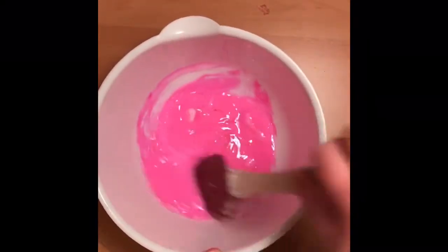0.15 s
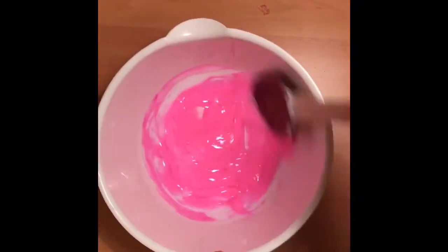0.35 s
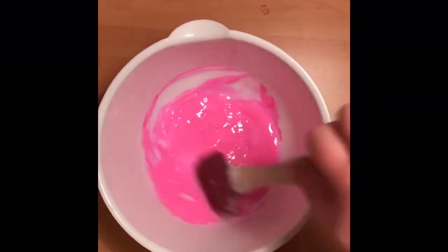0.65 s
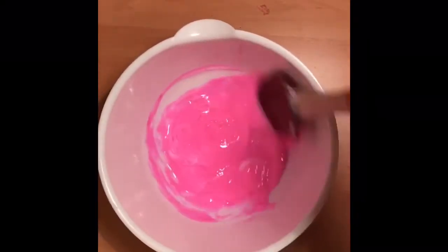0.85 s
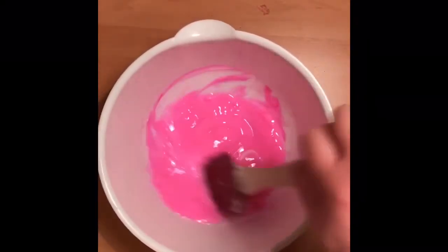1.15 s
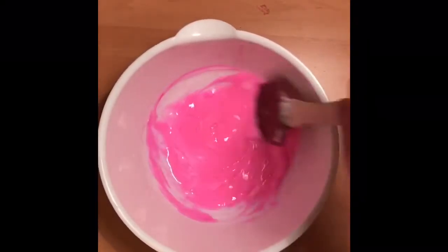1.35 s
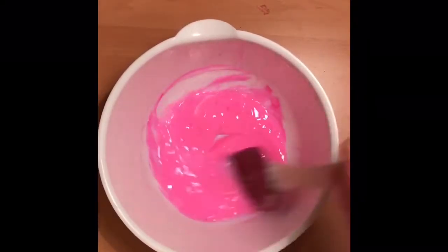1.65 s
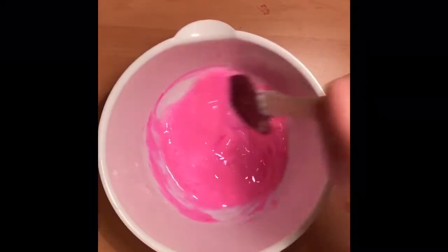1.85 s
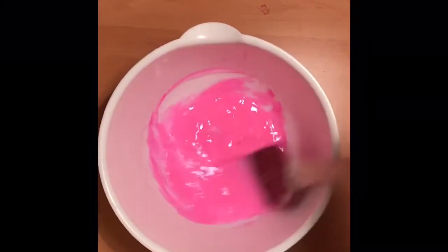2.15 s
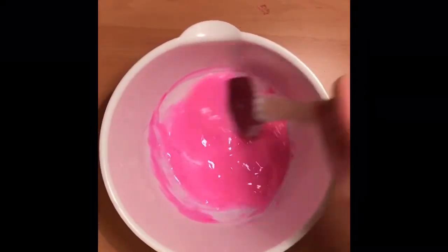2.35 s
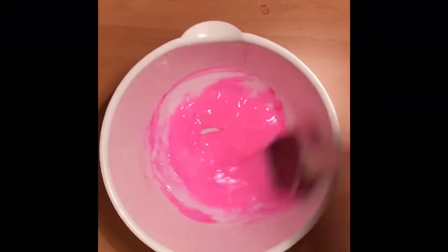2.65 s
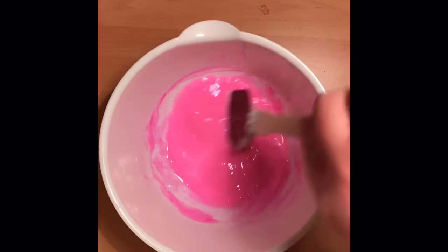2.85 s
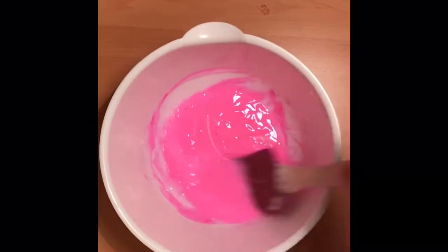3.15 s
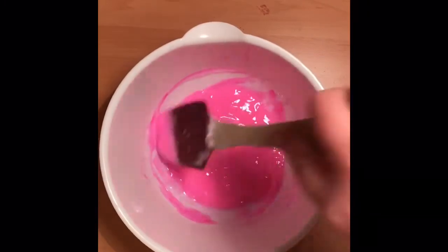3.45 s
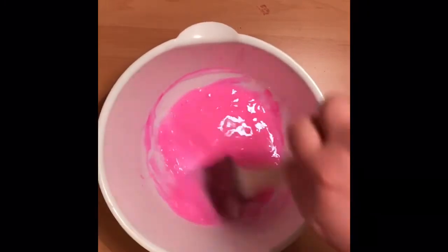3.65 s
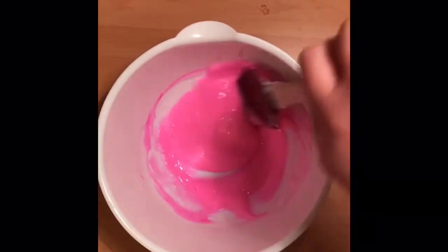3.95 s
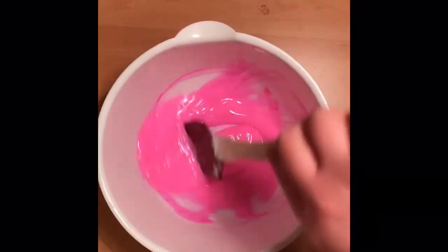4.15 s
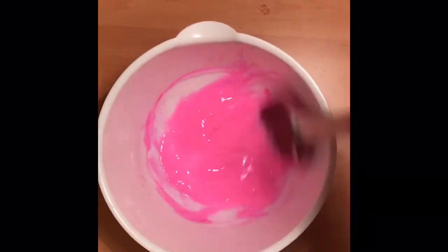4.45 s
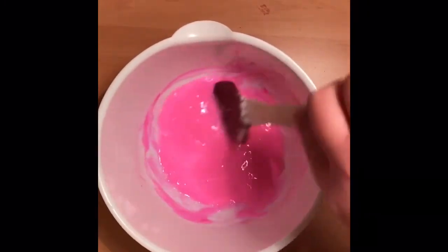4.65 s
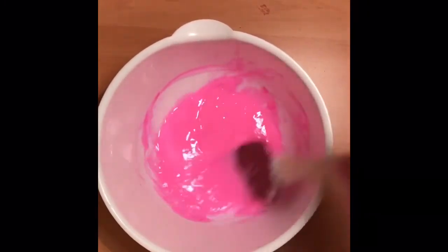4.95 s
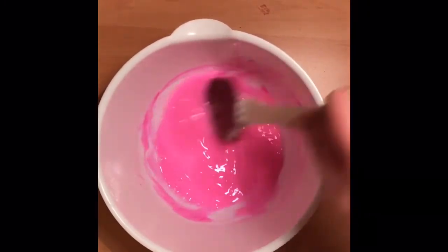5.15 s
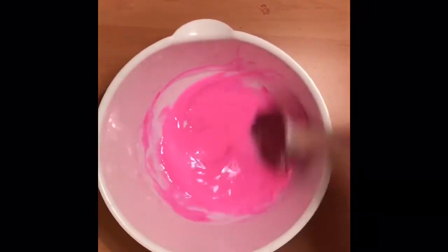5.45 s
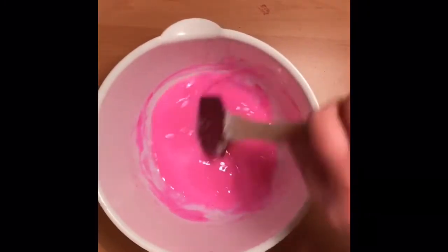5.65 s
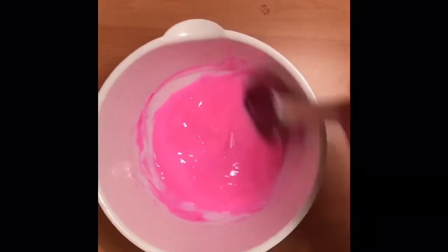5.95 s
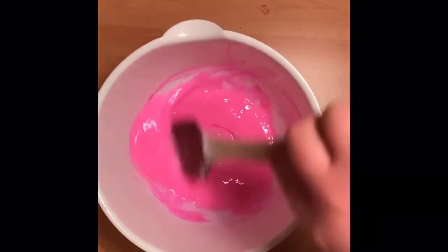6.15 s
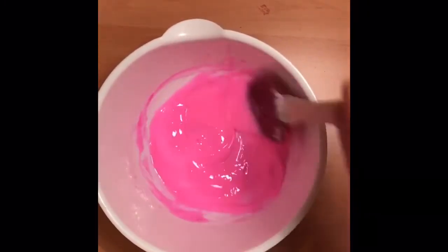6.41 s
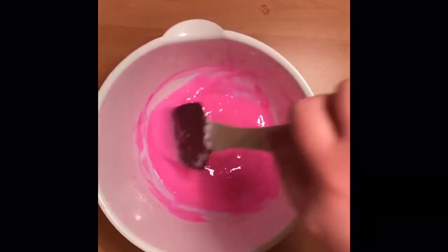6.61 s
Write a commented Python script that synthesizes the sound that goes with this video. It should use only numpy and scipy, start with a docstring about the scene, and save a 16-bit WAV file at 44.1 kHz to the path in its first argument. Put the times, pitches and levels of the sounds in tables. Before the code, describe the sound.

Close up in a small room, a spatula knocks against a plastic bowl in a loose, repeating rhythm as it stirs a thick, sticky mixture. The hollow knocks are strongest at first, give way to a few low thuds midway, then return. Between them the rubber blade rubs along the wall, the slime squelches softly and small bubbles pop over a low rumble and faint hiss.

```python
"""A small room with a wooden table, where a rubber spatula stirs thick slime in a plastic bowl.
Over a faint hiss, each turn lays down a bed of low rumble, drag and wet crackle. Trapped air
bubbles snap, the rubber sticks and slips along the wall, and the bowl gives a few low thuds.
Up front, about twice a second, the blade knocks the wall: a clack, a hollow ring, a table thump."""
import sys
import numpy as np
from scipy import signal
from scipy.fft import rfft, irfft, next_fast_len
from scipy.io import wavfile
from scipy.ndimage import uniform_filter1d, map_coordinates

SR = 44100
rng = np.random.default_rng(int(sys.argv[2]) if len(sys.argv) > 2 else 0)


def waveform_to_disk(signal):
    """Save audio, clipped to [-1, 1], as 16-bit WAV at the path in sys.argv[1]."""
    frames = np.transpose(np.atleast_2d(signal))
    scaled = np.clip(frames, -1, 1) * 32767
    samples = np.round(scaled).astype(np.int16)
    wavfile.write(sys.argv[1], SR, samples)


N = 298998

# tone of the noise floor: f/Hz, level/dB
HISS_EQ = [(25, -5), (60, -0.5), (300, 8.5), (1000, 7), (2500, 3.5), (5000, 1.5), (8500, 0), (10500, -3),
           (12500, -1.5), (15500, -5)]
# decay of the room: f/Hz, t60/s
ROOM_DECAY = [(100, 0.31), (500, 0.261), (2000, 0.213), (6000, 0.12), (14000, 0.054)]
# turns of the spatula round the bowl: start/s, effort/dB, wetness/dB
TURNS = [(-0.19, 4.5, -3), (0.31, 0.5, 1), (0.82, 2, 0), (1.33, -1.5, 1), (1.8, 0.5, -0.5), (2.22, 3, -0.5),
         (2.72, 0, -1), (3.12, -3.5, -3), (3.52, 0, 5), (3.9, 1.5, 1), (4.46, 0.5, -3), (4.93, -1, -4),
         (5.46, -0.5, -2), (5.92, 0, -0.5), (6.4, -2, -6.5)]
# the push builds, peaks and slackens within a turn: position/turns, level/dB
PUSH_ENVELOPE = [(0, -1.5), (0.3, 0.5), (0.65, 0), (0.88, -5), (1, -1.5)]
# low rumble of the table: f/Hz, level/dB
RUMBLE_EQ = [(22, -43.5), (33, -24), (45, 2), (70, -4), (87, 6.5), (125, 2), (170, 2), (210, -12.5),
             (300, -28.5), (600, -73)]
# dull drag on the wall: f/Hz, level/dB
DRAG_EQ = [(30, -59), (100, -20.5), (200, -3), (280, 4.5), (340, -7.5), (440, -15), (540, -3.5), (630, -10),
           (760, -25.5), (1100, -33.5), (3000, -59)]
# wet crackle of stirred slime: f/Hz, level/dB
SQUELCH_EQ = [(400, 3), (900, 2.5), (1700, 3.5), (2600, -3), (4000, -5.5), (8000, -19.5), (15000, -14)]
# bubble snaps: t/s, level/dB, f/Hz, width/octaves, upper resonance/dB, tick/dB
POPS = [(.411, -53.5, 2480, .4, -21.5, -16), (.521, -55, 2800, 0.45, -11, -14.5),
        (.886, -52.5, 2610, 0.41, -25, -18), (1.123, -57.5, 2227, 0.49, -26.5, -23),
        (1.203, -54.5, 8200, 0.15, -30, -1.5), (1.520, -49.5, 7780, 0.52, -21, -2.5),
        (1.5677, -55, 3180, .25, -2.5, -9.5), (1.5951, -47.5, 2760, 0.33, -1.5, 0.5),
        (1.999, -61, 2550, 0.42, -25, -21), (2.428, -55.5, 2490, 0.67, 0.5, -5),
        (2.9356, -57, 4870, 1, -2.5, -6), (4.102, -47.5, 4190, 0.77, -32.5, -12),
        (5.177, -61, 2396, 0.47, -22.5, -17), (5.2363, -45, 2730, 0.22, -17, -15.5),
        (5.327, -56, 3950, 0.66, -18.5, -11)]
# bright tick of a bursting film: f/Hz, level/dB
TICK_EQ = [(500, -9), (1100, -3.5), (2400, 4), (6000, -1.5), (9000, -1.5), (15000, -6.5)]
# early reflections off nearby surfaces: delay/s, level/dB
ECHOES = [(.0053, -10), (.0102, -12)]
# rubs along the wall: centre/s, length at half height/s, judder/dB, squish/dB
RUBS = [(0.188, 0.0543, -56, -75), (0.387, 0.043, -48.5, -63.5), (0.42, 0.027, -46.5, -64),
        (0.892, 0.0392, -44.5, -64.5), (1.322, 0.0346, -65.5, -60), (2.174, 0.055, -56, -78.5),
        (2.296, 0.04, -51.5, -68), (2.491, 0.0316, -56, -69.5), (2.568, 0.017, -65.5, -73),
        (3.177, 0.0524, -57.5, -89.5), (3.57, 0.052, -48.5, -63.5), (3.618, 0.0313, -47.5, -70),
        (4.224, .026, -47.5, -77), (4.71, 0.042, -50.5, -78), (5.247, 0.0676, -54.5, -81.5),
        (5.433, 0.046, -61.5, -69.5), (5.67, 0.062, -44.5, -70.5), (6.29, 0.037, -58.5, -88),
        (6.531, 0.0514, -60, -82.5), (6.752, 0.0262, -46.5, -74.5)]
# the wall under the slipping blade: f/Hz, level/dB
JUDDER_EQ = [(25, -59), (70, -9), (150, 0), (280, 6), (400, -4.5), (545, 0.5), (660, -9), (850, -22),
             (1500, -39.5), (4000, -52.5)]
# slime pressed out under the blade: f/Hz, level/dB
SQUISH_EQ = [(400, -27), (1000, 5), (1600, 9), (2700, 1), (3600, -2), (5000, -11), (9000, -17),
             (15000, -38)]
# low thuds of the bowl, from soft shoves near 100 Hz and the dull body of two wall knocks
# near 200 Hz: centre/s, level/dB, f/Hz
THUDS = [(3.558, -29, 106.8), (3.92, -35.5, 102.8), (4.204, -37.5, 192), (6.267, -41.5, 201),
         (6.744, -30, 102.6)]
# modes of table and bowl: f/Hz, level/dB, t60/s
BOWL_MODES = [(54.67, 6.5, 0.16), (87.14, 14, 0.212), (97.59, 11.5, 0.1565), (134.7, 13, 0.052),
              (155.16, 8, 0.13), (265.86, 2, 0.085), (281.3, 0.5, 0.142), (311.1, 17, 0.0239),
              (443.6, 9.5, 0.02115), (529.24, 9.5, 0.0587), (564.8, 8.5, 0.0393), (672.7, 0.5, 0.0307),
              (781, -39.5, 0.067), (1051.8, -10.5, 0.116), (1128.7, -16, 0.123), (1284.8, -11, 0.09),
              (1352.8, -10.5, 0.107), (1468, -16, 0.0836), (1597, -17, 0.0885), (1882, -20, 0.061),
              (2005.7, -12, 0.0752), (2073, -11, 0.0735), (2232.5, -13, 0.0536), (2447, -11.5, 0.0424),
              (2750, -16.5, 0.024), (3247, -16, 0.017), (3588, -18, 0.0184)]
# crowded upper modes of the wall: f/Hz, level/dB
CLACK_EQ = [(200, -10.5), (600, 16.5), (1300, 5), (2600, 3), (3500, -7.5), (4300, -16.5), (5500, -20),
            (8000, -33), (15000, -52)]
# hits on the wall: t/s, click/dB, ring/dB, thump/dB, hardness/(dB per octave), wall detune/semitones
KNOCKS = [(0.3201, -36.5, -35.5, -40, 1, 0), (0.835, -35.5, -38.5, -38.5, 4.5, 1),
          (1.3427, -39, -41.5, -37.5, 5, 2.5), (2.094, -67, -52, -59.5, 1, 0.5),
          (2.22, -33, -34, -39, 3, 0.5), (2.5402, -74.5, -42.5, -55.5, -5.5, 0.04),
          (2.553, -45, -43, -67, -9.5, 1.29), (2.7253, -57.5, -51, -40, 7.5, 3.5),
          (2.7338, -49.5, -44, -40, 7, 2), (3.571, -80, -48, -41, 4.5, -2),
          (4.1941, -56.5, -44.5, -44.5, -3.5, 4), (4.2195, -72, -45.5, -52.5, 2, 0),
          (4.4769, -43, -45, -44, 3, 1), (4.8989, -53.5, -44, -54, 9.5, 2),
          (5.3152, -49.5, -42.5, -59, 7, 1.5), (5.4675, -37.5, -37, -42, 0.5, 0),
          (5.939, -40, -39.5, -39, 1.5, 0.5), (6.252, -53.5, -51, -59.5, 1, 2),
          (6.263, -58.5, -53, -55.5, 5, 0), (6.413, -44, -48.5, -44, 2.5, 2),
          (6.731, -74.5, -54.5, -46, -11, 1)]


def amp(db):
    """Decibels to gain."""
    return 10 ** (np.asarray(db) / 20)


def unit(x):
    """Scale to rms 1."""
    return x / np.sqrt(np.mean(x ** 2) + 1e-20)


def along(points, hz):
    """Read a curve of (f/Hz, value) points on a log frequency axis."""
    f, v = np.transpose(points)
    return np.interp(np.log(hz + 1), np.log(f + 1), v)


def wobble(rate):
    """Smooth random modulation, rate knots a second."""
    return map_coordinates(rng.standard_normal(int(N * rate / SR) + 4), [np.arange(N) * rate / SR])


def coloured(x, eq):
    """x through an EQ curve, at rms 1."""
    m = next_fast_len(len(x) + 8192)
    gain = amp(along(eq, np.fft.rfftfreq(m, 1 / SR)))
    return unit(irfft(rfft(x, m) * gain, m)[:len(x)])


def noise(size, eq):
    """White noise through an EQ curve, at rms 1."""
    return coloured(rng.standard_normal(size), eq)


def add(track, s, sound):
    """Mix a sound into the track at time s."""
    start = max(round(s * SR), 0)
    part = track[start:start + len(sound)]
    part += sound[:len(part)]


def grains(size, per_s, spread_db):
    """Tiny sticky releases at random moments, a few much louder than the rest."""
    sizes = amp(spread_db * np.minimum(rng.exponential(size=size), 4))
    return (rng.random(size) < per_s / SR) * sizes * rng.standard_normal(size)


def hiss(level_db=-77):
    """A faint, steady noise floor."""
    return amp(level_db) * noise(N, HISS_EQ)


def room(x):
    """The short reverb of a small room, whose treble dies first."""
    hz, t, spectrum = signal.stft(rng.standard_normal(SR // 2), SR, nperseg=256)
    decay = amp(-60 * t / along(ROOM_DECAY, hz)[:, None])
    tail = signal.istft(spectrum * decay, SR, nperseg=256)[1]
    predelayed = np.pad(x, (300, 0))
    return signal.fftconvolve(predelayed, tail / np.linalg.norm(tail))[:N]


def stirring(rumble_db=-59, drag_db=-65, squelch_db=-80.5, lurch_db=3.5, last_turn_s=0.302):
    """The blade ploughs the slime in lurches: its push drives table rumble, wall drag and wet crackle."""
    starts, effort_db, wetness_db = np.transpose(TURNS)
    edges = np.append(starts, starts[-1] + last_turn_s)
    turns_done = np.interp(np.arange(N) / SR, edges, np.arange(len(edges)))
    turn = np.minimum(turns_done.astype(int), len(TURNS) - 1)
    per_turn = lambda values: uniform_filter1d(values[turn], size=SR // 20)  # 50 ms crossfades
    push = per_turn(effort_db) + np.interp(turns_done % 1, *np.transpose(PUSH_ENVELOPE))
    lurch = lurch_db * wobble(18)
    releases = grains(N, per_s=4000, spread_db=1.5)
    rumble = amp(rumble_db + 0.45 * push + 0.5 * lurch) * noise(N, RUMBLE_EQ)
    drag = amp(drag_db + push + lurch) * coloured(releases, DRAG_EQ)
    wet_gain = amp(squelch_db + per_turn(wetness_db) + 0.393 * push + lurch)
    return rumble + drag + wet_gain * coloured(releases, SQUELCH_EQ)


def cavity(size, hz, octaves):
    """An air pocket resonates: a band of noise, 16 dB down at the given width either side of hz."""
    width = 2 ** np.clip(octaves, 0.05, 0.9)
    band = [(hz / 3, -40), (hz / width, -16), (hz, 0), (hz * width, -16), (hz * 2, -30), (hz * 4, -50)]
    return noise(size, band)


def bubble_pops(upper_ratio=2.013, burst_t60=0.007, spray_db=-13, spray_t60=0.0638):
    """A film bursts with a tick and two cavity resonances; the snap bounces around the bowl."""
    out, t = np.zeros(N), np.arange(SR // 10) / SR
    envelope = amp(-60 * t / burst_t60) + amp(spray_db - 60 * t / spray_t60)
    for s, db, hz, octaves, upper_db, tick_db in POPS:
        lower = cavity(len(t), hz, octaves)
        upper = amp(upper_db) * cavity(len(t), hz * upper_ratio, octaves)
        tick = amp(tick_db) * noise(len(t), TICK_EQ)
        snap = amp(db) * envelope * (lower + upper + tick)
        add(out, s, snap)
        for delay, echo_db in ECHOES:
            add(out, s + delay, amp(echo_db) * snap)
    return out


def blade_rubs(slips_per_s=283, jitter=0.1398, grit=0.58):
    """The rubber sticks and slips at an uneven rate, shaking the wall and squeezing the slime."""
    out = np.zeros(N)
    for s, length, judder_db, squish_db in RUBS:
        size = int(2 * length * SR)
        slip_rate = slips_per_s * np.exp(jitter * wobble(120)[:size])
        slips = np.diff(np.floor(np.cumsum(slip_rate) / SR), prepend=0)  # one impulse a slip
        judder = amp(judder_db) * coloured(unit(slips) + grit * rng.standard_normal(size), JUDDER_EQ)
        squish = amp(squish_db) * coloured(grains(size, per_s=6000, spread_db=1.8), SQUISH_EQ)
        add(out, s - size / SR / 2, np.hanning(size) * (judder + squish))
    return out


def bowl_thuds(width_cycles=0.657, rebound_s=0.02763, rebound_db=-5.5, rebound_pitch=0.776):
    """The bowl thuds under a soft shove or a wall knock: three swings, each quieter and deeper."""
    out, t = np.zeros(N), np.arange(-SR // 20, SR // 20) / SR
    for s, db, hz in THUDS:
        for k in range(3):
            cycles = hz * rebound_pitch ** k * t
            swing = -np.sin(2 * np.pi * cycles) * np.exp(-(cycles / width_cycles) ** 2)
            add(out, s + k * rebound_s + t[0], amp(db + k * rebound_db) * swing)
    return out


def wall_clack(t, hardness, attack_s=0.000904, clack_t60=0.0214, clatter_t60=0.1618):
    """The wall's upper modes clack, then clatter; a bare edge is brighter than one padded with slime."""
    decay = amp(-2 - 60 * t / clack_t60) + amp(-14 - 60 * t / clatter_t60)
    attack = 1 - np.exp(-t / attack_s)
    tilted_eq = [(hz, db + hardness * np.log2(hz / 1000)) for hz, db in CLACK_EQ]
    return attack * decay * noise(len(t), tilted_eq)


def wall_knocks(lag_s=0.00874, lag_at_hz=87.14, lag_power=1.226, attack_cycles=3, vary_db=2.5):
    """Each hit rings bowl and table; bending waves carry the treble out first and the thump last."""
    out, t = np.zeros(N), np.arange(SR // 2) / SR
    rest_hz, mode_db, t60 = np.transpose(BOWL_MODES)[:, :, None]
    is_wall = (rest_hz > 400) & (rest_hz < 900)
    age = np.maximum(t - lag_s * (lag_at_hz / rest_hz) ** lag_power, 0)
    for s, click_db, ring_db, thump_db, hardness, semitones in KNOCKS:
        # the spot that is hit and the shifting load of slime detune the wall
        hz = rest_hz * 2 ** (is_wall * semitones / 12)
        # slime sliding on the wall smears the ring
        drift = signal.resample(rng.standard_normal((len(BOWL_MODES), 48)), len(t), axis=1)
        smear = 0.9 * drift * np.minimum(age * hz / 25, 1)
        attack = 1 - np.exp(-age * hz / attack_cycles)
        modes = np.sin(2 * np.pi * hz * age + smear) * attack * amp(mode_db - 60 * age / t60)
        hit_eq = [(150, thump_db), (420, ring_db), (750, ring_db), (1050, click_db)]
        gains = amp(along(hit_eq, rest_hz[:, 0]) + vary_db * rng.standard_normal(len(BOWL_MODES)))
        add(out, s, gains @ modes + amp(click_db) * wall_clack(t, hardness))
    return out


def scene(reverb_db=-14):
    """The mono mix: the bowl up close, a touch of room, hiss underneath."""
    bowl = wall_knocks() + bowl_thuds() + blade_rubs() + bubble_pops() + stirring()
    return (bowl + amp(reverb_db) * room(bowl) + hiss())[None]


def record(dry, low_cut_hz=36, top_hz=15700):
    """The microphone rolls off the sub bass and keeps nothing above its band limit."""
    m = next_fast_len(N + SR // 2)
    hz = np.fft.rfftfreq(m, 1 / SR)
    low_cut = 1 / np.sqrt(1 + (low_cut_hz / (hz + 1)) ** 12)
    return irfft(rfft(dry, m) * low_cut * (hz < top_hz), m)[..., :N]


dry = scene()
out = record(dry)
waveform_to_disk(out)
```